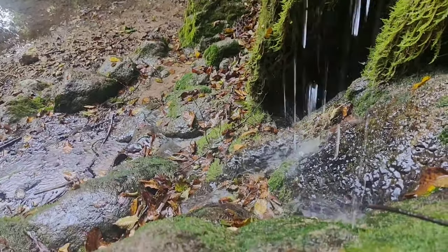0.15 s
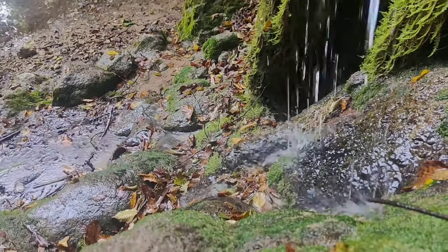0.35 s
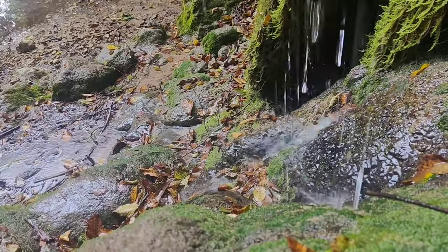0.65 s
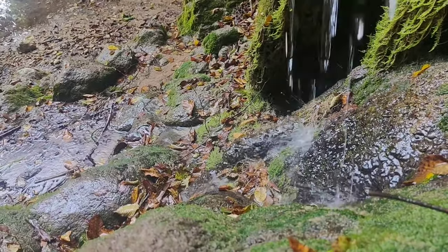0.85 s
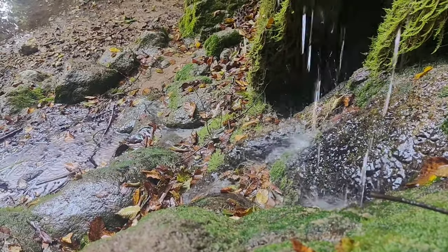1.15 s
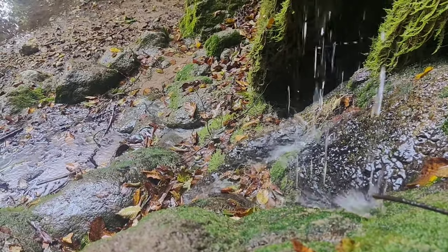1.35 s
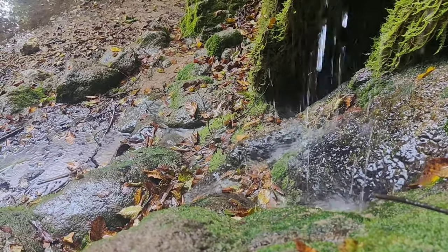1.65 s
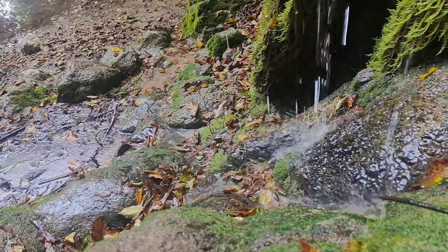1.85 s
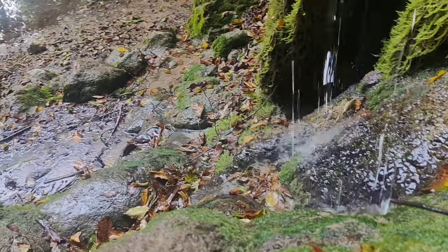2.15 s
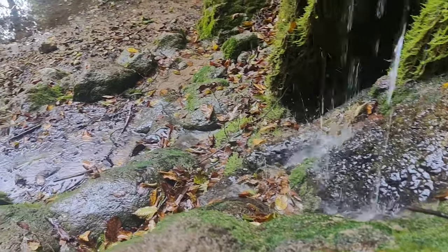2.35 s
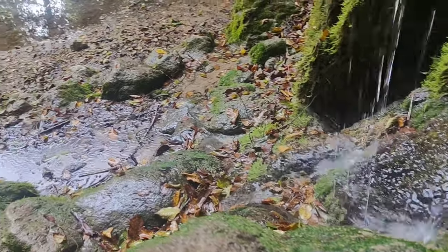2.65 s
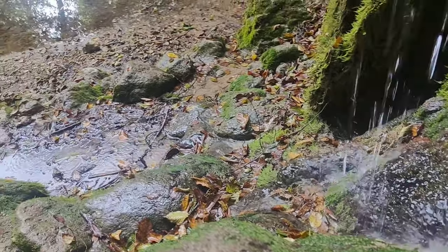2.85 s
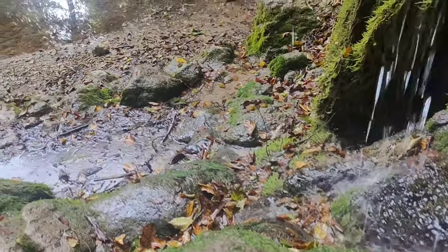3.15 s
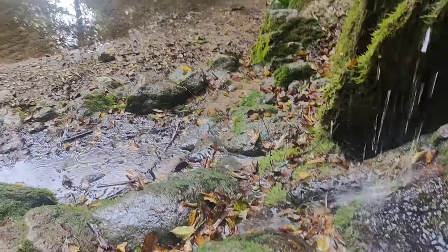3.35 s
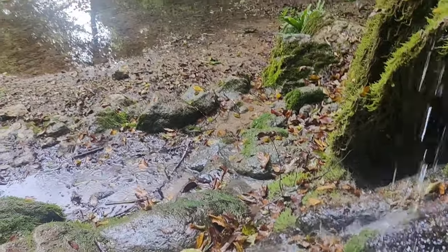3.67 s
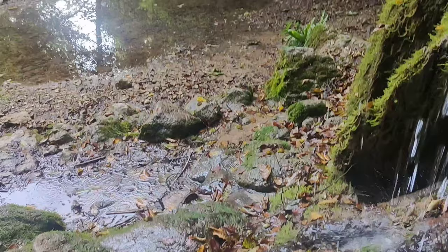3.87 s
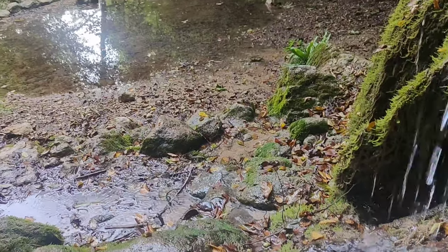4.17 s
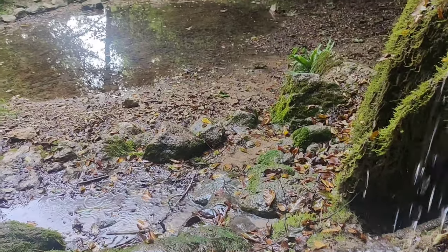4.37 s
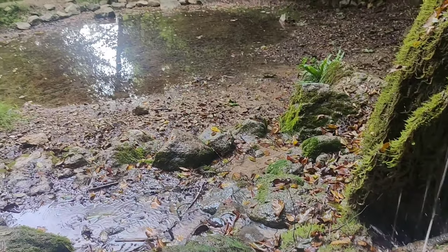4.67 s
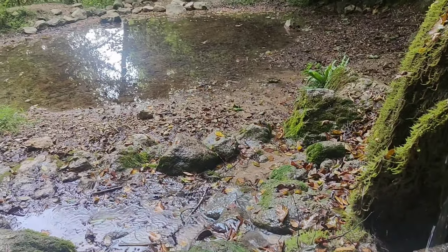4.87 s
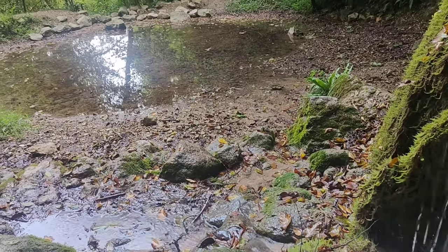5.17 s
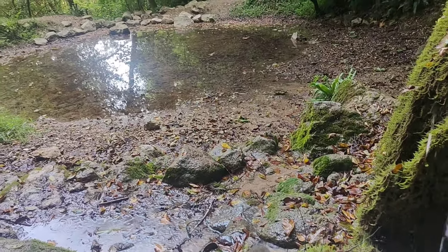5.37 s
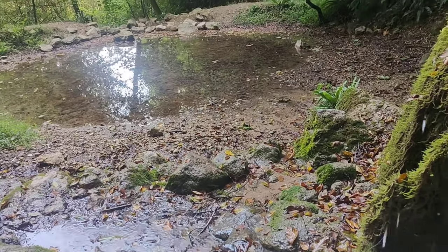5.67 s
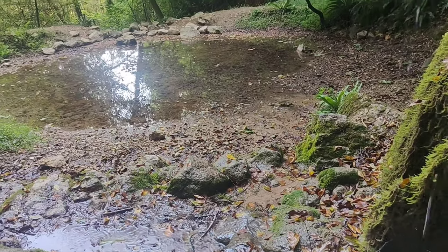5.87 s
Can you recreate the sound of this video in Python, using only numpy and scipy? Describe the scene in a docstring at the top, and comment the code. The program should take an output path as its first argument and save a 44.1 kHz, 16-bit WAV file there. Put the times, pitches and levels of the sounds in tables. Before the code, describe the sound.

From 0 s, thin streams of water fall as drops on wet stone very close by, already in full flow. Big drops make sharp wet smacks with tiny pitched pops, several each second at uneven intervals, between bright spits and short runs of fine patter. A light trickle and low puddle babble never stop. Dull plops come near 0.3, 0.8 and 2.6 s, with short wobbling bubbles at about 1.2 and 3 s. A strong smack lands near 1.8 s. After 2 s a faint, low engine drone rises far away, fullest around 3 to 4 s, then wavers. The level dips briefly at 3.3 s. The heaviest smacks fall from 3.5 to 4.8 s; from 5 to 5.8 s crisp, hissing spits stand out, with a tiny dip near 5.7 s. Wide, close stereo, treble leaning left, short rocky reflections; water continues to the end at 6 s.

```python
"""Thin streams of water break into drops and fall on wet stone, close by, over a trickle that never stops.
From the start big drops smack the water film, spit spray or plop into puddles and leave ringing bubbles;
small drops patter in runs as each strand lands, and nearby rocks throw the big smacks and spits back.
After about two seconds the faint drone of a far engine grows; the loudest smacks come soon after.
The level dips briefly twice, near 3.3 s and 5.7 s. Drops are short rings and noise bursts, spray is noise."""
import sys
import numpy as np
from scipy import signal
from scipy.fft import rfft, irfft
from scipy.io import wavfile
from scipy.ndimage import uniform_filter1d

SR = 44100
rng = np.random.default_rng(int(sys.argv[2]) if len(sys.argv) > 2 else 0)


def dump_mix(stems):
    """Bounce the given channels to the path in sys.argv[1] as a 16-bit WAV at rate SR."""
    frames = np.atleast_2d(stems).T  # one column per channel
    limited = np.clip(frames, -1, 1)  # hard clip at full scale
    pcm = np.round(limited * 32767).astype(np.int16)
    wavfile.write(sys.argv[1], SR, pcm)


N = 265261
TIME = np.arange(N) / SR
AGE = np.arange(SR // 25) / SR   # time since a drop has landed [s]

# strands of water: how abruptly they land and trail off, and the dripping that never stops
STRAND_ATTACK_S, STRAND_RELEASE_S, TRICKLE_DB = .015, .015, -32
# big drops on the film: typical ring length, and its weaker echo off a nearby stone, BOUNCE_S later or more
SMACK_RING_S, BOUNCE_DB, BOUNCE_S = .00066, -10, .002
# a drop to one side reaches that microphone sooner; AHEAD_DB is the left-right balance of one straight ahead
LAG_S_PER_DB, AHEAD_DB = .00001, 2.5
SPIT_DB = -13   # level added to every spit
# lesser drops of both kinds fall at random, most often while a strand is landing
STRAY_SMACKS_PER_S, STRAY_SMACK_DB, SMACK_LOW_HZ, SMACK_HIGH_HZ = 12, -15.5, 2470, 4300
STRAY_SPITS_PER_S, STRAY_SPIT_DB, SPIT_LOW_HZ, SPIT_HIGH_HZ = 15, -12.5, 4170, 8870
# scatter either way: level of all lesser drops, left-right balance of the lesser smacks
STRAY_SPREAD_DB, STRAY_PAN_DB = 2, 10
STRAY_FOLLOWS = .5   # how strongly lesser drops crowd into the strands
PLOP_SPLASH_DB, PLOP_SPLASH_S = -5, .009   # splash against its plop, and how slowly it fades
BUBBLE_WOBBLE, WOBBLE_HZ = .4, 143   # depth and middle rate; each bubble wobbles at 0.5 to 1.5 times this rate
PATTER_HOLDS_BACK = .32   # share of the flow's swing that the spray on the stone lacks
PUDDLE_FOLLOWS = .75   # share of the flow's swing that reaches the puddles
FIRING_HZ = 17.75   # middle firing rate of the engine
CUTOFF_HZ = 15700


def from_db(db):
    """Turn decibels into a gain."""
    return 10 ** (np.asarray(db) / 20)


def rms_one(x):
    """Scale a sound to an average (RMS) strength of 1."""
    return x / np.sqrt(np.mean(x ** 2) + 1e-20)


def panned(db):
    """Left and right gains for a level difference, left minus right."""
    return from_db(np.array([[.5], [-.5]]) * db)


def add(out, s, sound):
    """Mix a short stereo sound in at time s."""
    i = int(np.clip(s * SR, 0, N - 1))
    out[:, i:i + sound.shape[-1]] += sound[..., :N - i]


def filtered(x, hz, kind):
    """Keep the low, the high or a band of frequencies, with gentle edges."""
    return signal.sosfilt(signal.butter(2, hz, kind, fs=SR, output="sos"), x)


def drift(rate):
    """Slow random wander around zero with an RMS of 1; a higher rate moves faster."""
    step = 40   # computed every 40 samples, then joined by straight lines
    r = np.exp(-2 * step * np.pi * rate / SR)
    noise = rng.standard_normal(N // step + 2002)
    slow = signal.lfilter([1], [1, -2 * r, r * r], noise)[2000:]   # skip the settling
    return np.interp(np.arange(N) / step, np.arange(len(slow)), rms_one(slow))


def colour(x, points, power=1):
    """Minimum-phase filter of a spectrum, at unit power gain; another power scales its dB and keeps its level."""
    size = 4096
    hz, db = np.transpose(points)
    grid_hz = np.arange(size // 2 + 1) * SR / size
    gain = from_db(power * np.interp(np.log(grid_hz + 1), np.log(hz), db))
    # folding the cepstrum makes the filter respond as early as it can
    cepstrum = irfft(np.log(gain))[:size // 2]
    cepstrum[1:] *= 2
    response = irfft(np.exp(rfft(cepstrum, size)))
    if power == 1:
        response /= np.linalg.norm(response)
    return signal.fftconvolve(np.atleast_2d(x), response[None], axes=1)[:, :N]


def lean(x):
    """The treble reaches the left side better than the right."""
    # shape of the left-right difference, scaled for each side below: (frequency [Hz], level [dB])
    balance = [(300, 2), (1200, -5), (1800, 2), (3200, -1.5), (4400, 8), (5700, 8.5), (7600, 16),
               (10500, 15), (15000, 2)]
    left = colour(x[0], balance, power=.47)
    right = colour(x[1], balance, power=-.32)
    return np.vstack([left, right])


def pair(alike, size):
    """Two noises, left and right, with a given correlation."""
    mid, side = rng.standard_normal((2, size))
    alike = np.clip(alike, -1, 1)
    return (np.sqrt(1 + alike) * mid + np.sqrt(1 - alike) * side * [[1], [-1]]) / np.sqrt(2)


def ping(hz, rise_s, decay_s, glide=0., lag_s=0.):
    """A pocket of air swells and rings down, and with glide its pitch rises; peak about 1."""
    lags = np.maximum([[-lag_s], [lag_s]], 0)   # a positive lag delays the right side, a negative one the left
    age = np.maximum(AGE - lags, 0)
    shape = (1 - np.exp(-(age / rise_s) ** 2)) * np.exp(-age / decay_s)
    return -shape / shape.max() * np.sin(2 * np.pi * hz * age * (1 + glide * age))


def burst(crack_s, tail_db, tail_s, alike):
    """A short crack of noise and the fading hiss of the flying spray."""
    crack = AGE / crack_s * np.exp(1 - AGE / crack_s)
    tail = from_db(tail_db) * np.exp(-AGE / tail_s)
    return (crack + tail) * pair(alike, len(AGE))


def flow():
    """Level in dB of the water that lands: each strand sets in, holds and trails off, over a steady trickle."""
    # strands that land as a run of small drops: (start [s], length [s], level [dB])
    strands = [(0.009, 0.04, -21.5), (0.071, 0.39, -26), (0.638, 0.28, -25.5), (0.925, 0.17, -24),
               (1.135, 0.11, -24.5), (1.365, 0.07, -23.5), (1.529, 0.13, -22.5), (1.686, 0.22, -28.5),
               (1.969, 0.24, -25), (2.236, 0.2, -27.5), (2.47, 0.155, -22.5), (2.697, 0.25, -25),
               (2.951, 0.06, -21.5), (3.166, 0.099, -25), (3.428, 0.096, -24), (3.547, 0.155, -25),
               (3.745, 0.12, -26), (3.949, 0.2, -23), (4.287, 0.16, -22.5), (4.691, 0.25, -30),
               (4.959, 0.085, -19.5), (5.093, 0.195, -23), (5.322, 0.18, -26), (5.568, 0.135, -23),
               (5.805, 0.16, -28)]
    power = from_db(TRICKLE_DB) ** 2
    for s, length_s, db in strands:
        attack = np.clip((TIME - s) / STRAND_ATTACK_S, 0, 1)
        release = np.exp(-np.clip((TIME - s - length_s) / STRAND_RELEASE_S, 0, 20))
        power = power + (from_db(db) * attack * release) ** 2
    return 10 * np.log10(power)


def strays(flow_db, per_s, db, low_hz, high_hz):
    """Lesser drops, closer together when more water falls: rows (time [s], level [dB], pitch [Hz])."""
    when, mass, pitch = rng.random((round(per_s * N / SR), 3)).T
    fallen = np.cumsum(from_db(STRAY_FOLLOWS * flow_db))
    # one drop for each equal share of the fallen water
    share = (np.arange(len(when)) + when) / len(when)
    s = np.interp(share, fallen / fallen[-1], TIME)
    level_db = db + STRAY_SPREAD_DB * (2 * mass - 1)
    return list(zip(s, level_db, low_hz * (high_hz / low_hz) ** pitch))


def smacks(flow_db):
    """A big drop squeezes air out of the film: a wet slap, a pitched ring, then its weaker echo off a nearby stone."""
    # the biggest drops on the film: (time [s], level [dB], pitch [Hz], left minus right [dB])
    biggest = [(0.0101, -3.5, 3450, 8), (0.0245, -4, 2580, -13), (0.1609, -4.5, 2950, 7),
               (0.2052, -4, 2270, 2), (0.3214, -5, 3040, 7), (0.3618, -3.5, 2070, 9),
               (0.4619, -2.5, 2750, 6), (0.5396, -2.5, 2900, 5), (0.7043, -5.5, 3560, -15),
               (0.7233, -4.5, 2910, 2), (0.816, -5, 2370, 6), (0.8802, -4.5, 2130, 7),
               (1.0174, -4.5, 3010, 3), (1.0992, -5, 2540, 7), (1.2853, -4.5, 3210, 4),
               (1.4536, -6, 2300, 9), (1.49, -6.5, 1700, 7), (1.6355, -6.5, 3520, 9), (1.6622, -4, 2390, 7),
               (1.7162, -5.5, 4190, 9), (1.8084, -3.5, 2500, 4), (1.8413, 0, 3060, 3),
               (1.8765, -1.5, 2180, 9), (2.1185, -4, 2670, 3), (2.1616, -5, 3320, 6),
               (2.2251, -3.5, 2950, 5), (2.5689, -3.5, 2990, -11), (2.6915, -6, 4120, 8),
               (2.9075, -6, 3370, 1), (2.9885, -7.5, 3170, 3), (3.0049, -5, 3090, 7),
               (3.0416, -3.5, 2990, -1), (3.1288, -2, 2480, 4), (3.2004, -5, 2840, -6),
               (3.2313, -1.5, 2240, 3), (3.3399, -2.5, 2130, 3), (3.5275, 1, 2450, 0),
               (3.6737, 2.5, 3100, -2), (3.796, -2.5, 2990, 2), (3.8654, 0.5, 3230, 0),
               (3.9575, -6.5, 3560, -3), (4.1697, -4, 3270, -1), (4.2216, -3, 3380, 1),
               (4.5445, 0, 2300, 4), (4.565, -4.5, 3290, -1), (4.6801, -4.5, 4240, 1),
               (4.718, 0.5, 2900, -1), (4.7843, -3.5, 2560, 0), (4.8345, 1, 3580, -6),
               (4.8565, -7, 3400, -3), (4.9885, -5.5, 3250, -2), (5.4805, -5.5, 2730, -2),
               (5.515, -4, 2760, -2), (5.5477, 0, 3270, -2), (5.627, -6, 3490, -4),
               (5.7655, -6.5, 3740, -5), (5.8329, -3, 2780, 0), (5.9572, -5.5, 3660, -4)]
    rings, slaps = np.zeros((2, 2, N))
    lesser = [(*drop, STRAY_PAN_DB * (2 * rng.random() - 1))
              for drop in strays(flow_db, STRAY_SMACKS_PER_S, STRAY_SMACK_DB, SMACK_LOW_HZ, SMACK_HIGH_HZ)]
    for s, db, hz, pan_db in list(biggest) + lesser:
        decay_s = SMACK_RING_S * 2 ** (.5 * (rng.random() - .5))
        lag_s = LAG_S_PER_DB * (pan_db - AHEAD_DB)
        air = ping(hz, rise_s=.00025, decay_s=decay_s, glide=8, lag_s=lag_s)
        ring = from_db(db) * panned(pan_db) * air
        add(rings, s, ring)
        add(rings, s + BOUNCE_S * (1 + .5 * rng.random()), from_db(BOUNCE_DB) * ring)
        push_on_stone = ping(610, rise_s=.0001, decay_s=.0022)
        add(rings, s, from_db(db - 27.5) * push_on_stone)
        slap = burst(crack_s=.0005, tail_db=-15, tail_s=.003, alike=.5)
        add(slaps, s - .0002, from_db(db - 8.5) * panned(pan_db) * slap)
    return rings + filtered(slaps, [950, 4600], "band")


def spits(flow_db):
    """Drops shatter on stone: a bright crack with a tiny ringing bubble in it."""
    # the loudest drops on bare stone: (time [s], level before SPIT_DB [dB], bubble pitch [Hz])
    loudest = [(0.2605, -4, 4500), (0.4455, -3, 4460), (0.5043, 1.5, 4180), (0.8295, -6, 4500),
               (0.8467, 0, 4340), (1.093, -3, 4440), (1.2318, -1, 4300), (1.2473, -1.5, 8900),
               (1.346, -7, 7980), (1.5551, -2.5, 4450), (1.9063, -3, 4700), (2.1845, -9, 6900),
               (2.2886, -4.5, 4750), (2.3644, -5.5, 4930), (2.4959, -4, 5470), (2.5285, -3, 8140),
               (3.0302, -7, 4910), (3.1713, 0, 7400), (3.1868, -6, 5660), (3.2325, -5, 6350),
               (3.2595, -8, 5100), (3.2773, -3.5, 7900), (3.6502, -3, 4560), (3.6589, -3, 6130),
               (3.7055, -6, 5750), (3.9185, -6.5, 5230), (3.9672, -5, 6760), (4.4102, -6, 5300),
               (4.4661, -1, 7000), (4.6227, 0, 8400), (4.8261, -5, 7560), (5.0856, 0, 7240),
               (5.2307, -3, 8050), (5.2672, 1.5, 8260), (5.2911, -0.5, 7450), (5.4199, 1, 7300),
               (5.4775, -2.5, 6670), (5.5793, -2.5, 7600), (5.6756, 2, 7100), (5.6875, -3, 7600),
               (5.7287, 0, 5900), (5.818, -4, 7030), (5.8275, -8, 5130), (5.9577, -3.5, 5630)]
    # their colour: (frequency [Hz], relative power density [dB per Hz])
    spit_colour = [(200, -11), (1000, -15.5), (2000, -5), (3000, 3), (5000, 11), (7200, 7), (9000, 2.5),
                   (12500, 4), (16000, -56)]
    out = np.zeros((2, N))
    lesser = strays(flow_db, STRAY_SPITS_PER_S, STRAY_SPIT_DB, SPIT_LOW_HZ, SPIT_HIGH_HZ)
    for s, db, hz in list(loudest) + lesser:
        crack = burst(crack_s=.00042, tail_db=-14, tail_s=.003, alike=.2)
        ring = ping(hz, rise_s=.0005, decay_s=.0009, lag_s=rng.uniform(0, .0006))
        add(out, s, from_db(db + SPIT_DB) * (.9 * crack + ring))
    return lean(colour(out, spit_colour))


def rocks(x, near_db, near_s, far_db, far_s):
    """Close stones scatter the sound within milliseconds, the overhang a little later: fading noise echoes."""
    age = TIME[:SR // 5]
    near = np.exp(-age / near_s) * (age > .0015)
    far = np.exp(-age / far_s) * (age > .006)
    echo = from_db(near_db) * near / np.linalg.norm(near) + from_db(far_db) * far / np.linalg.norm(far)
    return x + signal.fftconvolve(x, echo * pair(.25, len(age)), axes=1)[:, :N]


def plop_splash():
    """A short, dull wash of water that falls back."""
    wash = burst(crack_s=.0005, tail_db=-4.5, tail_s=PLOP_SPLASH_S, alike=.6)
    wash = wash * (1 - AGE / AGE[-1])   # ends in silence
    return 2 * filtered(wash, [520, 1400], "band")


def puddle_drops():
    """Cavities give a dull, quickly damped plop and a splash; bubbles ring longer and wobble as they rise."""
    # drops that open a cavity in a puddle: (time [s], level [dB], pitch [Hz])
    plops = [(0.151, -10.5, 560), (0.3038, -6.5, 670), (0.7755, -10, 680), (1.585, -13, 660),
             (2.5888, -6, 630), (5.687, -18, 570)]
    # the clearest trapped bubbles: (time [s], level before the 2 dB lift below [dB], pitch [Hz])
    bubbles = [(0.498, -17.5, 1150), (0.744, -17.5, 1160), (1.146, -18.5, 1630), (1.204, -8, 1183),
               (2.567, -15.5, 1130), (2.594, -16, 1175), (2.981, -9, 1140), (3.649, -16.5, 1220),
               (4.09, -13.5, 1230), (4.1121, -11.5, 1203), (4.419, -11.5, 1620), (4.449, -16, 1090),
               (4.996, -17, 1190), (5.1402, -16, 1190), (5.2351, -15, 1256), (5.831, -15, 1640),
               (5.849, -18, 1230), (5.92, -15, 1187)]
    out = np.zeros((2, N))
    for s, db, hz in plops:
        add(out, s, from_db(db) * ping(hz, rise_s=.0007, decay_s=.003, glide=3, lag_s=.00005))
        add(out, s, from_db(db + PLOP_SPLASH_DB) * plop_splash())
    for s, db, hz in bubbles:
        turns = WOBBLE_HZ * (.5 + rng.random()) * AGE + rng.random()
        wobble = 1 + BUBBLE_WOBBLE * np.sin(2 * np.pi * turns)   # the bubble changes shape
        ring = ping(hz, rise_s=.0035, decay_s=.0038, glide=1.5, lag_s=.0001)
        add(out, s, from_db(db + 2) * panned(-3) * wobble * ring)
        for when, pitch in rng.uniform(-1, 1, (3, 2)):   # smaller bubbles come up around it
            small = ping(hz * 2 ** (.5 * abs(pitch)), rise_s=.001, decay_s=.0022)
            add(out, s + .03 * when, from_db(db - 11) * small)
    return filtered(out, 220, "high")   # small cavities radiate no bass


def small_drops(per_s, low_hz, high_hz, cycles, spread_db, pan_db, scatter_s, size):
    """Drops land at random; each rings for a few cycles at a pitch, strength and place of its own."""
    when, pitch, mass, place, path, damping = rng.random((int(per_s * N / SR), 6)).T[..., None]
    hz = low_hz * (high_hz / low_hz) ** pitch
    db = spread_db * np.minimum(-np.log(1 - mass), 3.5)   # many weak drops, few strong ones
    steps = np.arange(size)
    at = (when * (N - size)).astype(int) + steps
    sides = []
    for side in (1, -1):   # left, right; the delay and the level difference are drawn separately
        delay_s = np.maximum(side * scatter_s * (path - .5), 0)
        turns = hz * np.maximum(steps / SR - delay_s, 0)
        life = turns / (cycles * (.5 + damping))
        gain = from_db(db + side * pan_db * (place - .5) / 2)
        rings = gain * np.sqrt(life) * np.exp(-life) * np.sin(2 * np.pi * turns)
        sides.append(np.bincount(at.ravel(), rings.ravel(), N))
    return np.diff(sides, prepend=0)   # the step from sample to sample favours the treble


def puffs(per_s, spread_db, decay_s, steady, alike):
    """Shattering drops throw up short puffs of hissing mist, over a steady share."""
    strength_db = spread_db * np.minimum(rng.exponential(1, N), 3)
    landings = (rng.random(N) < per_s / SR) * from_db(strength_db)
    power = signal.lfilter([1], [1, -np.exp(-1 / (decay_s * SR))], landings ** 2)
    return rms_one(np.sqrt(power + steady)) * pair(alike, N)


def patter(flow_db):
    """Small drops tick on the stone in clusters; coarse spray splats in the mids, fine mist hisses above."""
    # colour of drops and spray: (frequency [Hz], relative power density [dB per Hz])
    patter_colour = [(880, -48), (1500, -5), (1640, -5), (1920, -8), (2270, 0.5), (3480, -0.5),
                     (3880, -3.5), (7240, -5), (8570, -11), (14600, -15), (16000, -41)]
    drops = small_drops(per_s=480, low_hz=1530, high_hz=10700, cycles=2.2, spread_db=3.8,
                        pan_db=16, scatter_s=.0002, size=512)
    coarse = filtered(puffs(150, spread_db=5, decay_s=.0018, steady=.4, alike=.2), 4500, "low")
    fine = filtered(puffs(100, spread_db=3.2, decay_s=.0026, steady=.05, alike=0), 4500, "high")
    clusters = drops * from_db(3 * drift(30))
    ticks = from_db(-3) * rms_one(colour(clusters, patter_colour))
    spray = from_db(.7) * rms_one(colour(coarse + fine, patter_colour))
    surge_db = flow_db - flow_db.mean()   # the spray on the stone swells less than the flow does
    return lean(from_db(flow_db - PATTER_HOLDS_BACK * surge_db) * (ticks + spray))


def puddles(flow_db):
    """Small drops stir the puddles into a low babble of short rings and unsteady noise."""
    # colour of the babble: (frequency [Hz], relative power density [dB per Hz])
    puddle_colour = [(110, -19), (200, -2.5), (380, -11), (620, -6.5), (850, -10), (1180, -1),
                     (1450, -11.5), (1680, -6), (2200, -21.5)]
    drops = small_drops(per_s=520, low_hz=376, high_hz=1780, cycles=.89, spread_db=4.5,
                        pan_db=-2, scatter_s=.00056, size=512)
    wash = pair(.8, N) * from_db(4 * drift(60))
    babble = from_db(-6) * rms_one(colour(drops, puddle_colour))
    babble = babble + from_db(-7.5) * rms_one(colour(wash, puddle_colour))
    stir_db = flow_db.mean() + PUDDLE_FOLLOWS * (flow_db - flow_db.mean())
    return lean(from_db(stir_db) * babble)


def engine():
    """The drone of a far engine; each tone fades in and out on its way through the woods."""
    # loudness of the drone: (time [s], level [dB])
    loudness = [(0, -62), (1.8, -57.5), (2.9, -47), (3.8, -46.5), (4.7, -51), (6, -48)]
    # its tones: (multiple of the firing rate [-], level that then drifts [dB])
    engine_tones = [(5, -2.5), (6, -5.5), (7, -18), (9, -10)]
    turns = np.cumsum(FIRING_HZ * (1 + .0062 * drift(.77))) / SR
    tones = np.zeros(N)
    for multiple, db in engine_tones:
        fading = from_db(db + 2 * drift(.73))
        tones += fading * np.sin(2 * np.pi * (multiple * turns + rng.random()))
    return from_db(np.interp(TIME, *np.transpose(loudness))) * tones


def rumble():
    """A faint low background: coloured noise whose level wanders slowly."""
    # its colour: (frequency [Hz], relative power density [dB per Hz])
    rumble_colour = [(20, -39), (60, -9.5), (130, 5.5), (200, 1), (400, 0), (1000, -65)]
    return from_db(-47) * colour(pair(.48, N), rumble_colour) * from_db(2 * drift(.72))


def dip():
    """Gain of the brief dips in level, with softened edges."""
    # the dips: (start [s], length [s], level change before softening [dB])
    dips = [(3.283, .045, -6), (5.733, .013, -6)]
    db = sum(depth_db * ((TIME > s) & (TIME < s + length_s)) for s, length_s, depth_db in dips)
    return from_db(uniform_filter1d(db, size=200))


def scene():
    """Big drops with their echoes, the patter and babble of the landing water, and the low background."""
    flow_db = flow()
    big = rocks(smacks(flow_db) + spits(flow_db), near_db=-7, near_s=.0022, far_db=-17, far_s=.035)
    water = big + puddle_drops() + patter(flow_db) + puddles(flow_db)
    return dip() * (water + rumble() + engine())


def record(dry):
    """The tallest peaks are rounded off, then everything above the cutoff is removed."""
    rounded = dry / (1 + dry ** 6) ** (1 / 6)
    return signal.sosfilt(signal.ellip(10, .1, 70, CUTOFF_HZ, fs=SR, output="sos"), rounded)


dry = scene()
out = record(dry)
dump_mix(out)
```